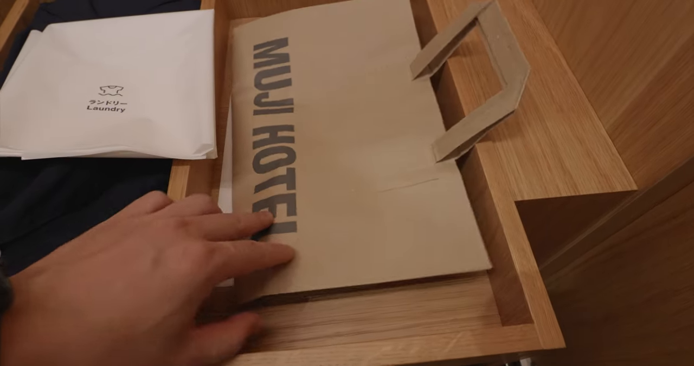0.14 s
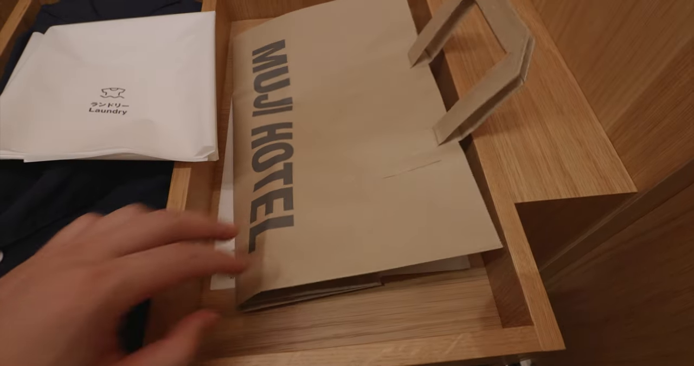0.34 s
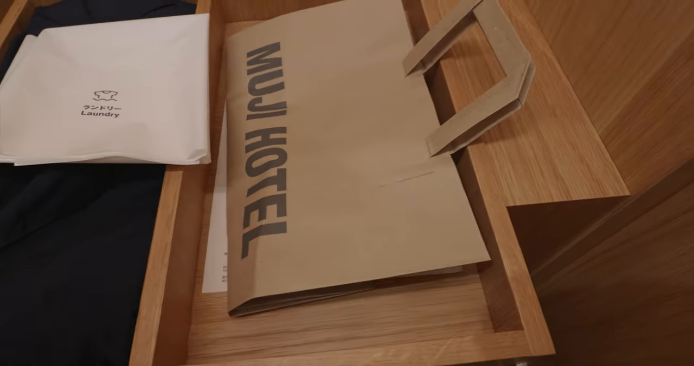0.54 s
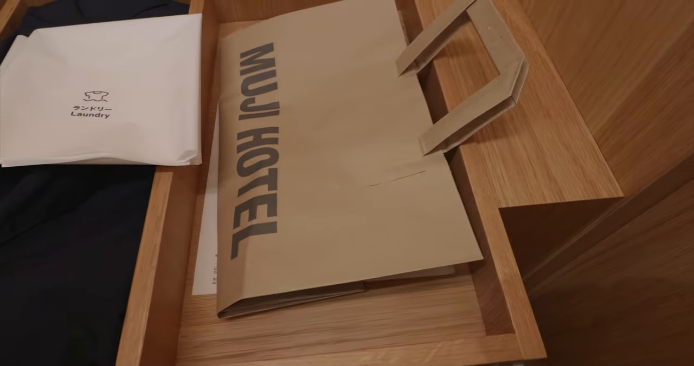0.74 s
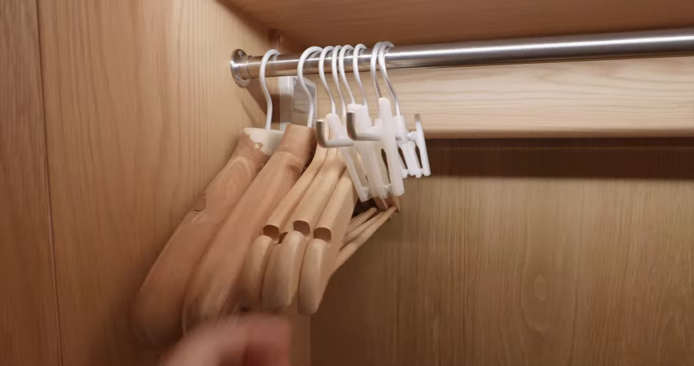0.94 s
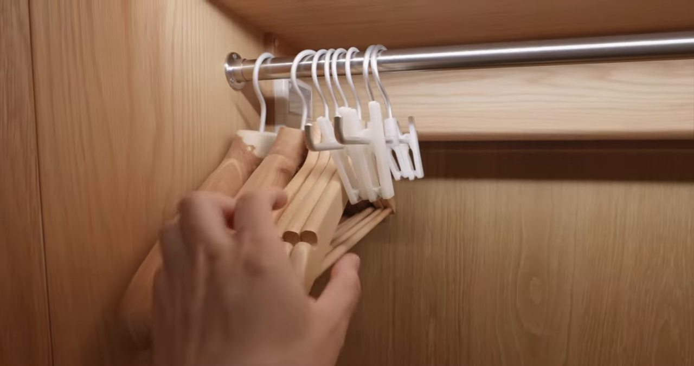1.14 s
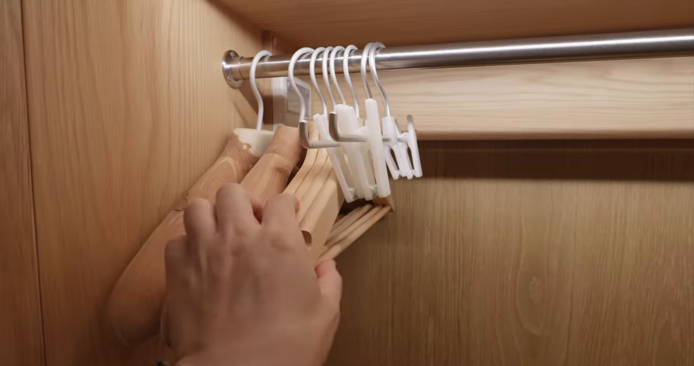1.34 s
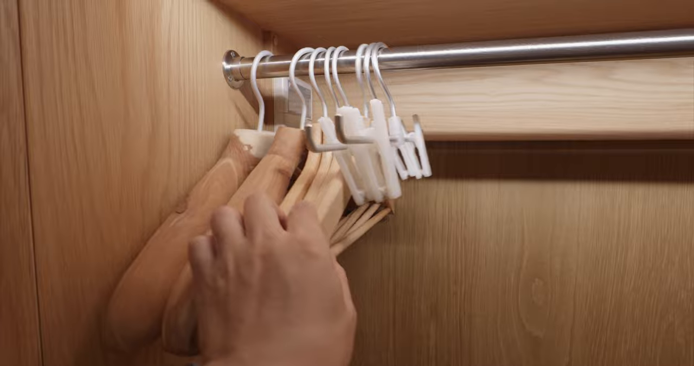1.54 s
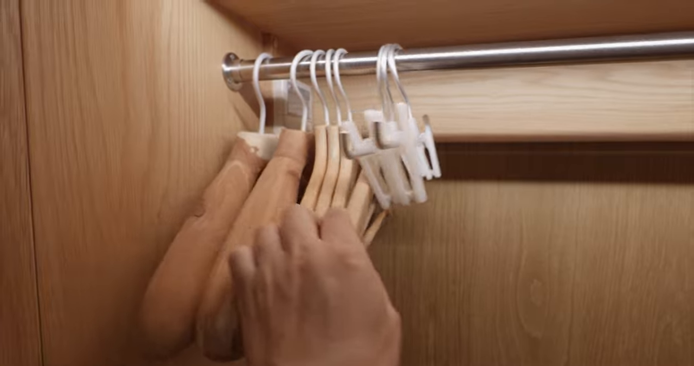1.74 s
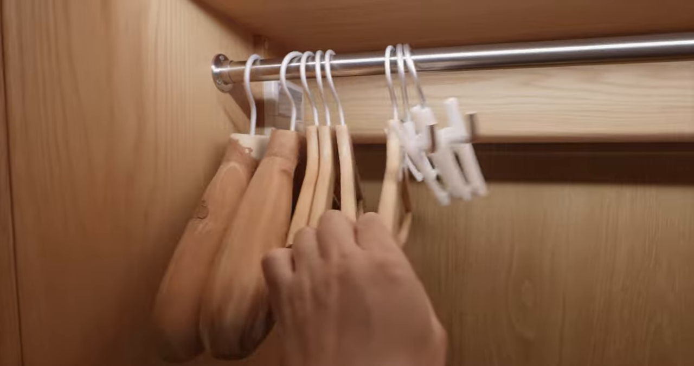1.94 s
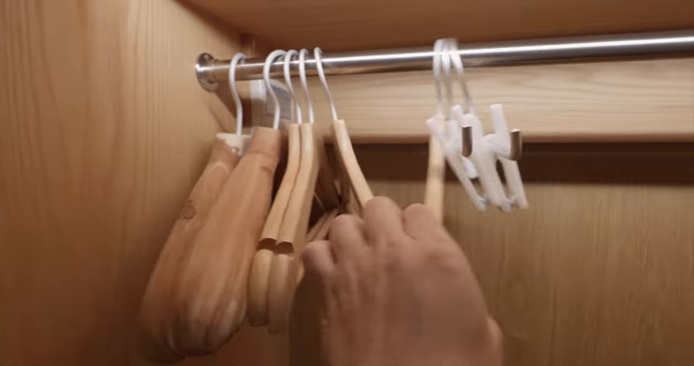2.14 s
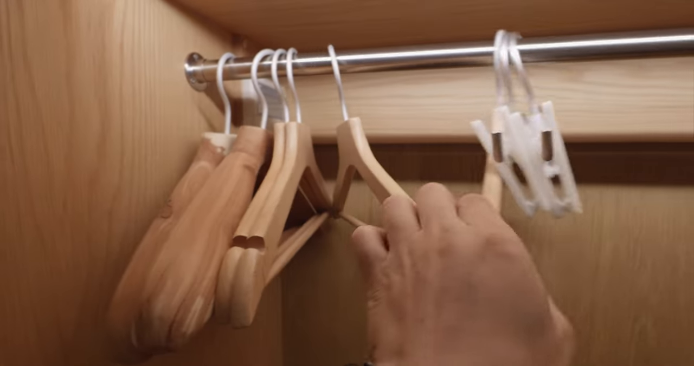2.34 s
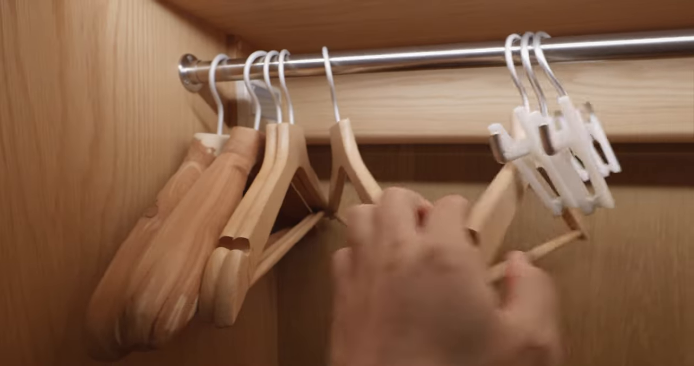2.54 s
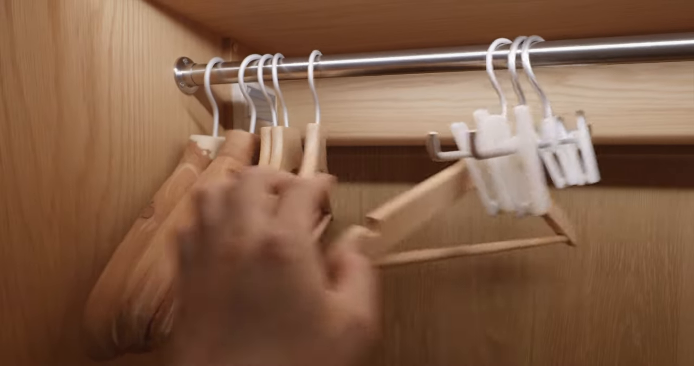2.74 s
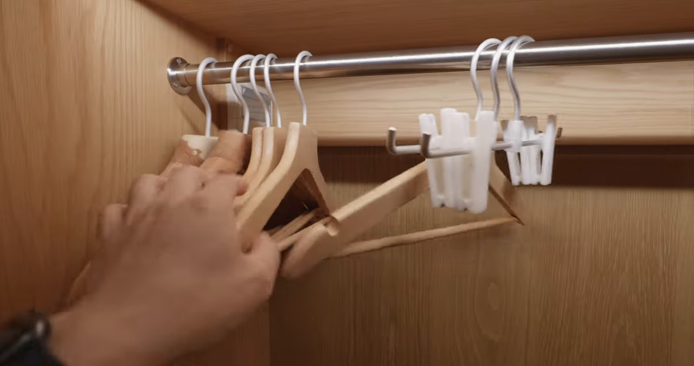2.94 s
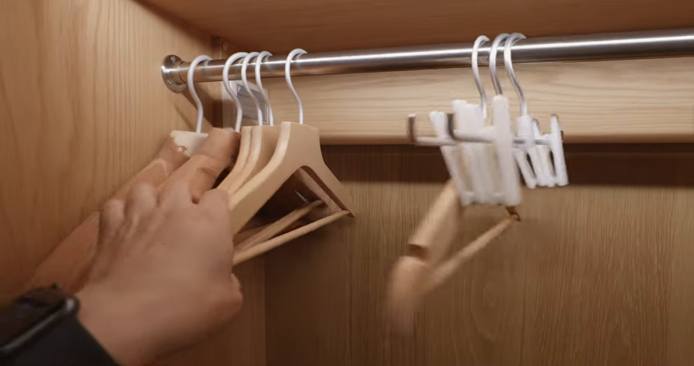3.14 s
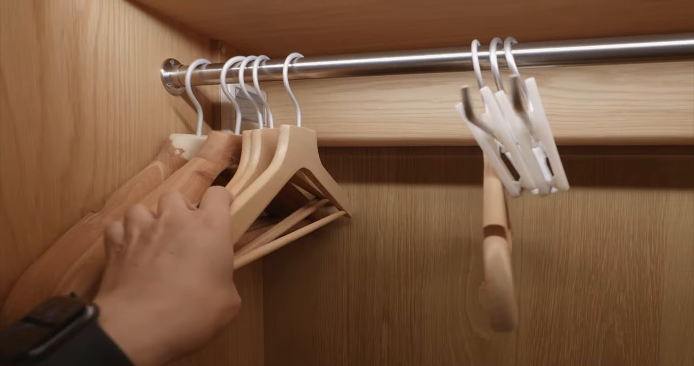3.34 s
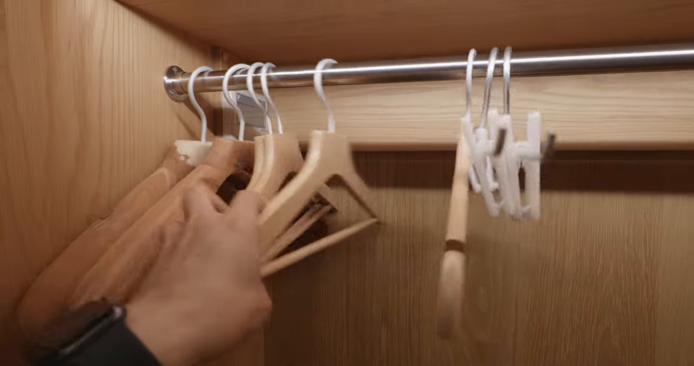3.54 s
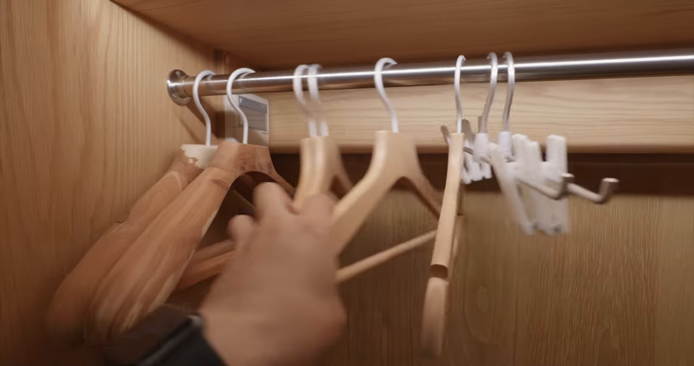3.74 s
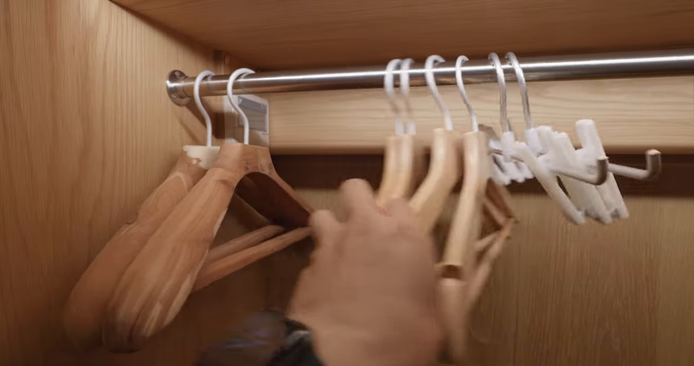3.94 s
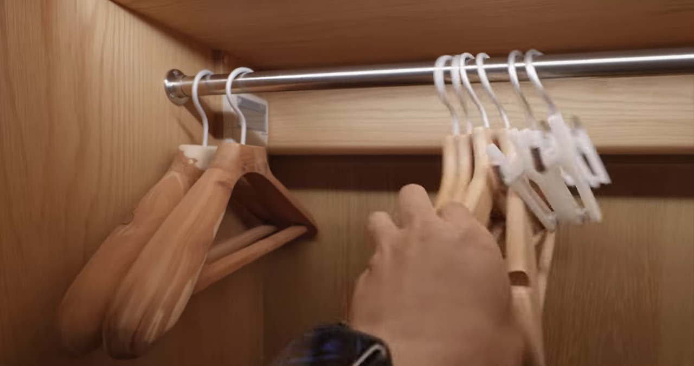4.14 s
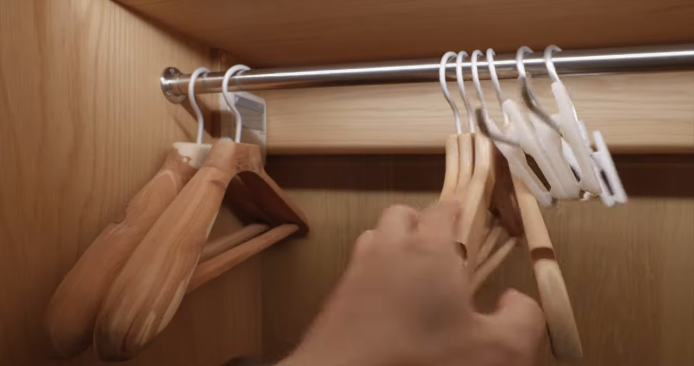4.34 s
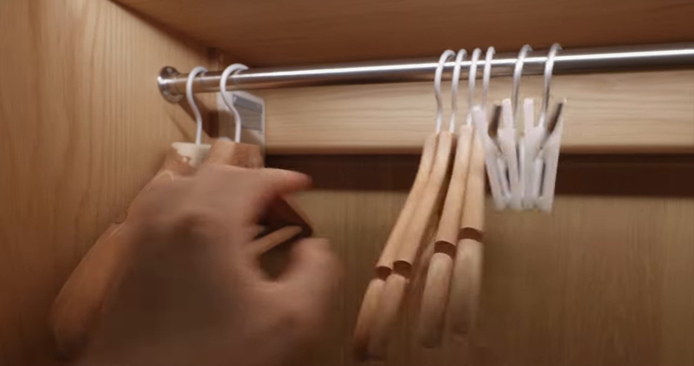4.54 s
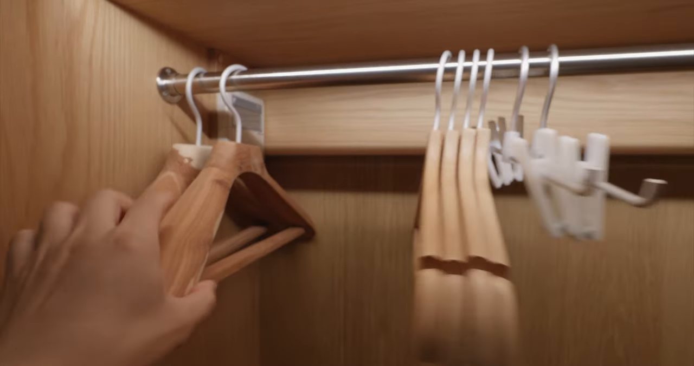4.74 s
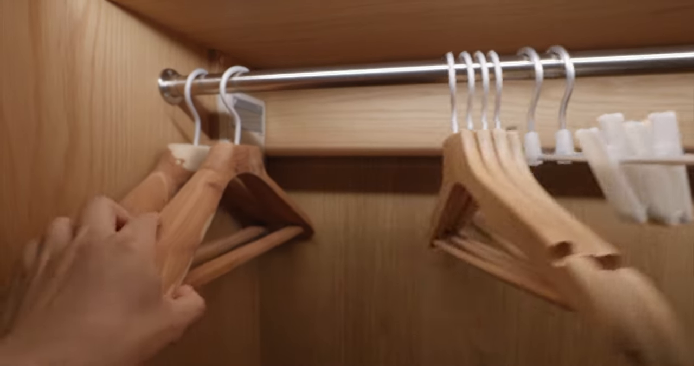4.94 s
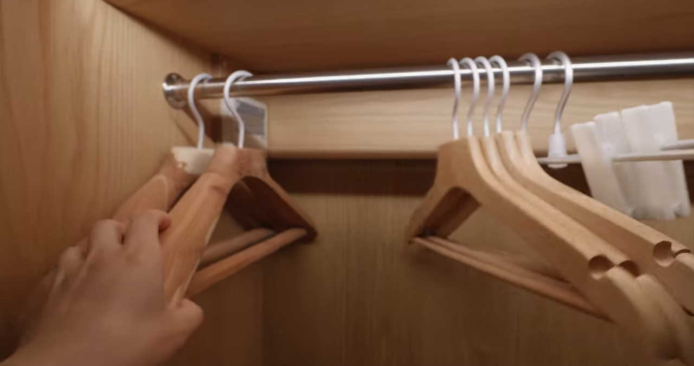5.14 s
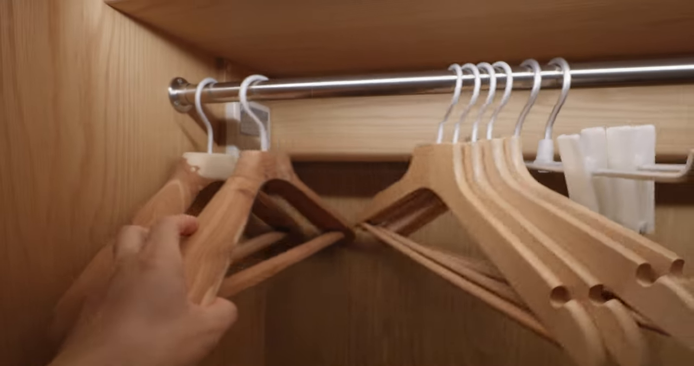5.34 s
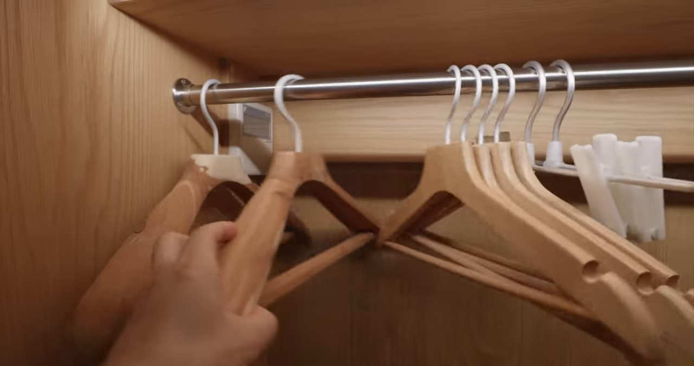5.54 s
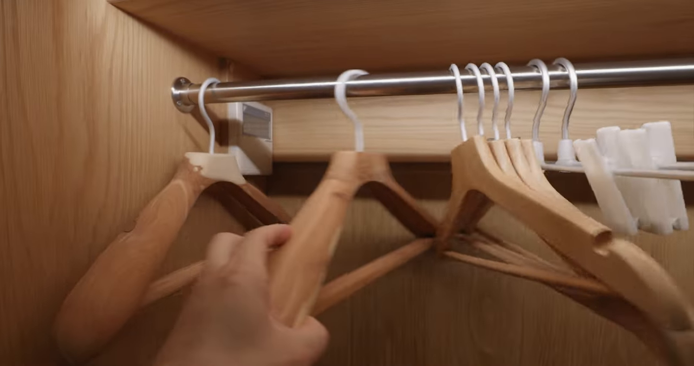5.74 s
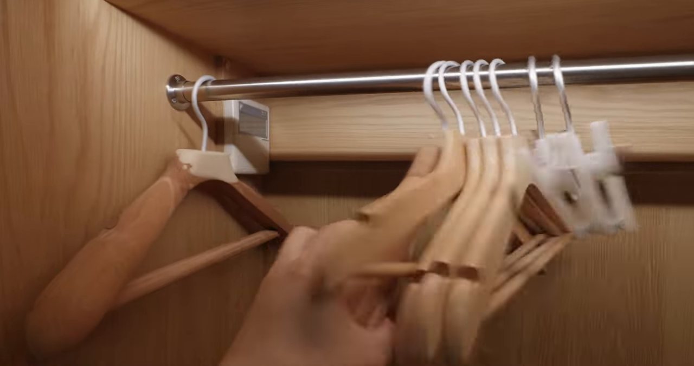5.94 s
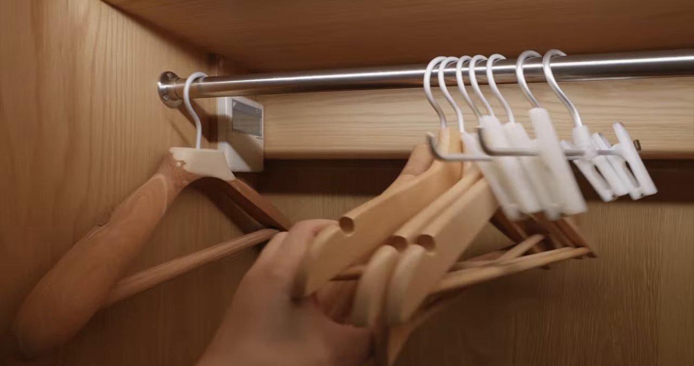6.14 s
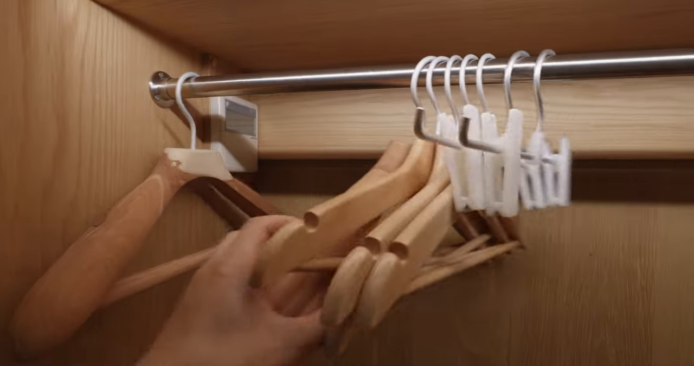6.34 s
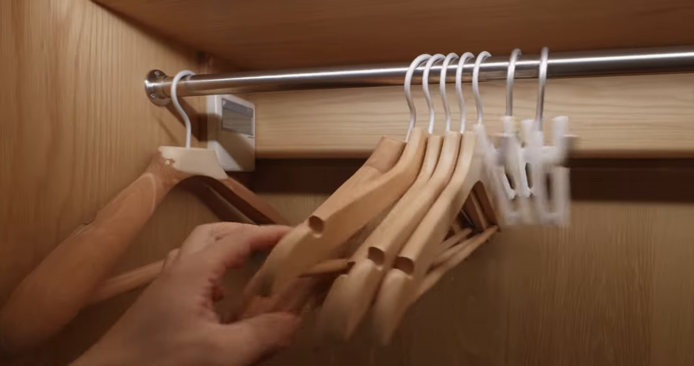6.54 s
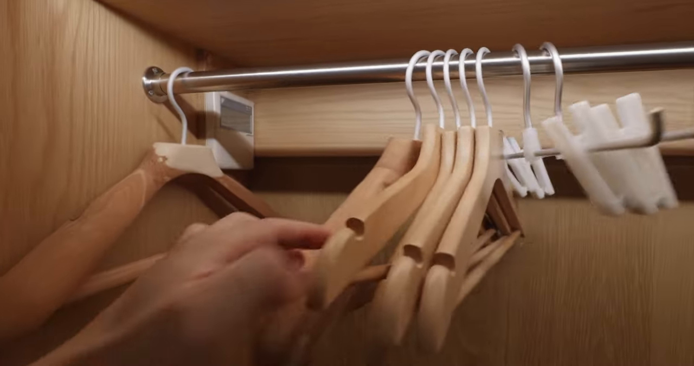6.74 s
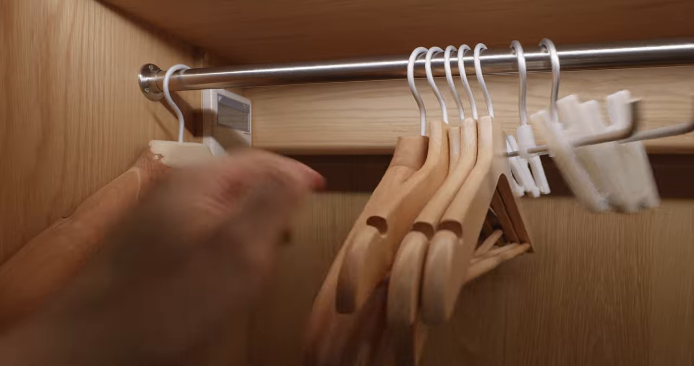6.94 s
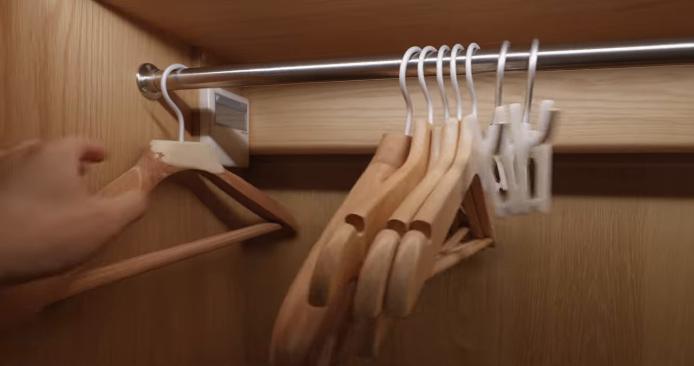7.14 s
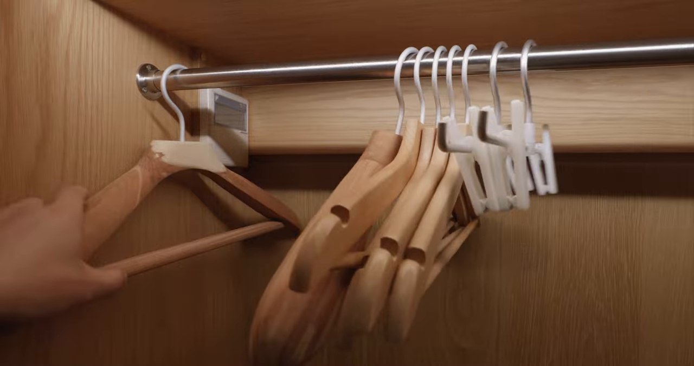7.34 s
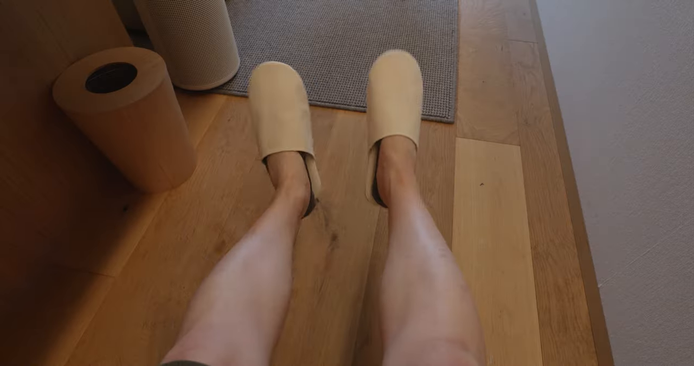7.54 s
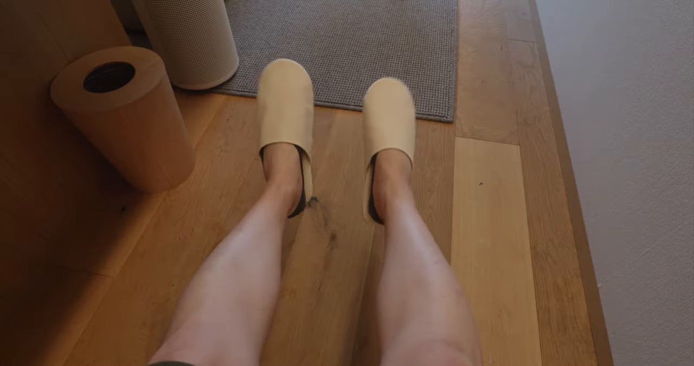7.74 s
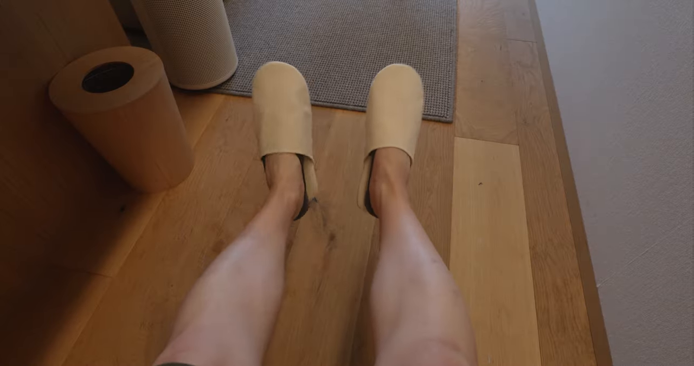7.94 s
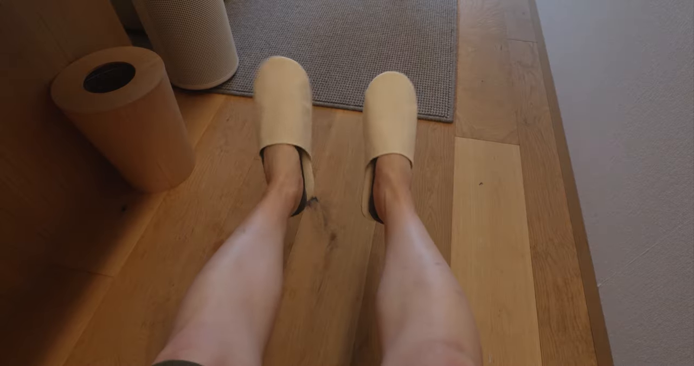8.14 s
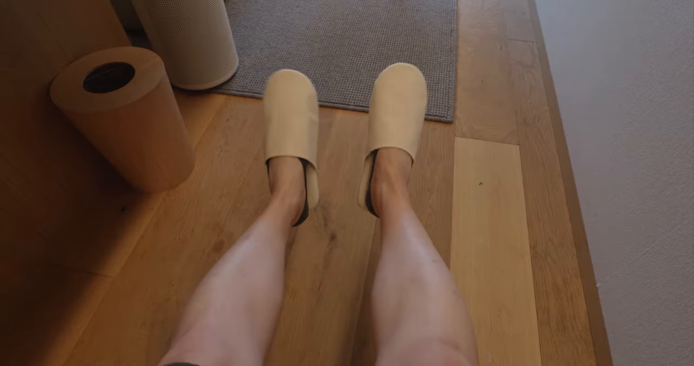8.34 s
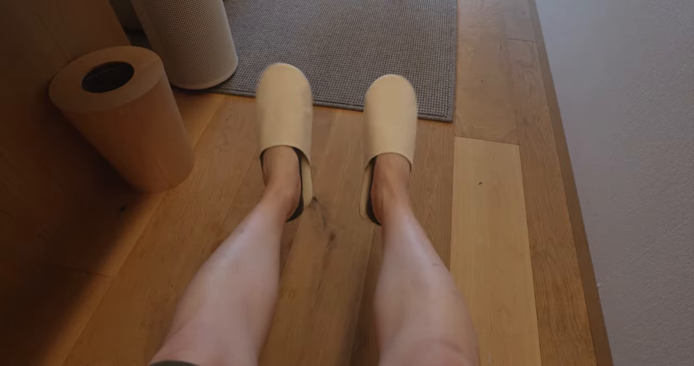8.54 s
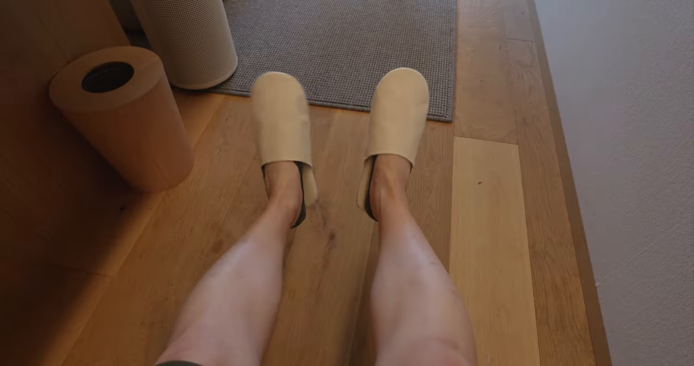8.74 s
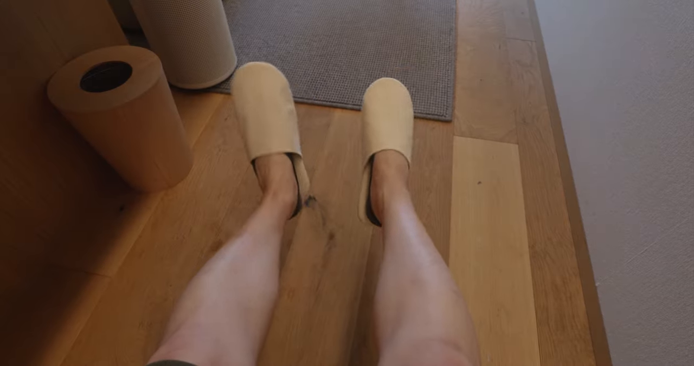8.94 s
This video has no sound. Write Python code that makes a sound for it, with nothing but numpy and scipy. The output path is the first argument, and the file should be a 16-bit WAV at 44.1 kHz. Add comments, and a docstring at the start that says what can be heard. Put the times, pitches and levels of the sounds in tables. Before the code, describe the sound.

Recorded close in a small, quiet room with soft, low air noise throughout. From 0 to about 1.1 s, a hand brushes stiff paper in short, dry strokes, strongest at the very start, with a few faint snaps. Then wooden hangers are pushed along a steel rail inside a wardrobe: dull panel bumps near 1.4 and 1.8 s, a flurry of thin hook ticks from 1.6 to 2.0 s, and a scrape with hollow knocks around 2.0 s. After a lull, wood clacks at 2.9 s and heavier thuds come near 3.3 s. A tiny pitched squeak chirps at 3.6 s, followed by clacks and gritty slides to 4.6 s. A thud at 4.9 s leads to denser, brighter clattering from 5.0 to 6.1 s, then softer clacks until 7.1 s. Bumps and a faint scrape follow at 7.3 s. At about 7.6 s it cuts abruptly, leaving only quiet air.

```python
"""A hand first brushes a paper bag in a drawer: short strokes of friction noise and a few soft snaps.
From about 1.1 s wooden hangers are pushed along the steel rail of a wardrobe. Impulses excite damped modes
as they clack together and bump the panels; their hooks tick, and scrape by many small random slips.
Near 3.6 s stick-slip makes one harmonic squeak; at 7.575 s the wardrobe's sound, with its reverberation,
is cut off abruptly. Soft, filtered air noise of a small room lies under it all and remains at the end."""
import sys
import numpy as np
from scipy import signal
from scipy.fft import irfft
from scipy.io import wavfile
from scipy.ndimage import uniform_filter1d

SR = 44100
rng = np.random.default_rng(int(sys.argv[2]) if len(sys.argv) > 2 else 0)


def dump(signal):
    """Clip the signal to [-1, 1] and save it as 16-bit WAV at the path in sys.argv[1]."""
    limited = np.clip(np.atleast_2d(signal).T, -1, 1)
    pcm = np.round(limited * 32767).astype(np.int16)
    wavfile.write(sys.argv[1], SR, pcm)


N = 400869

# Clacks of wooden hangers; the last two, soft and dull, stand for a starting scrape:
# (time [s], level [dB], treble gain [dB], pitch of the struck hanger [Hz])
CLACKS = [(1.0748, -10, -23, 2195), (2.8714, 18, -22, 2220), (2.877, 12, -10.5, 1990),
          (3.0103, 17, -25, 3460), (3.717, 19.5, -20.5, 1876), (3.986, -3, -23, 1710),
          (4.0868, 6.5, -37, 2200), (4.223, 6, -17, 1720), (4.351, 10.5, -25, 2020),
          (4.4917, -4, -53.5, 2214), (4.617, -1, -65, 1916), (4.7176, 7.5, -27.5, 1917),
          (4.8628, -9.5, -15.5, 1890), (5.0273, 4.5, -7, 1613), (5.0939, 16, -20, 2063),
          (5.1092, 16.5, -22, 2265), (5.4334, 19.5, -11.5, 2205), (5.5229, 7.5, -17.5, 1920),
          (5.682, 15.5, -25, 2016), (5.731, 8, -28.5, 2110), (5.7695, 13.5, -17, 2170),
          (5.7998, 16.5, -24.5, 2150), (6.0103, 3.5, -3, 1520), (6.02, 19.5, -10.5, 2230),
          (6.0879, 8.5, -11, 2220), (6.1661, 7, -32, 2170), (6.2945, 10, -42, 2160),
          (6.3948, 13, -43, 2180), (6.4909, -3, -39, 2000), (6.6982, -8.5, -52, 1510),
          (6.7454, -2, -48, 2124), (6.7741, 9, -17.5, 2030), (6.9067, 16.5, -37.5, 2030),
          (6.9296, 16.5, -24.5, 1978), (7.1005, 2, -23.5, 2134), (7.533, -10, -59, 1970),
          (7.555, -2.5, -48, 1347)]
# Hangers bumping the cabinet: (time [s], level [dB], middle gain [dB], edge gain [dB], boom of the wood [Hz])
KNOCKS = [(1.379, 17, -15, -22, 242), (1.465, 28.5, -3, -4, 237), (1.797, 22, -14, -22, 230),
          (1.872, 18, -19, -38, 223), (2.008, 20.5, 3.5, -1, 619), (2.021, 20.5, 6, -21, 144),
          (2.154, 20.5, 4, -22, 640), (2.855, 14.5, 3.5, -14, 243), (3.265, 30, -9.5, -9, 246),
          (3.295, 27, -1.5, -9.5, 227), (3.322, 20.5, -7, -4.5, 250), (3.478, 20, -9.5, -17, 246),
          (3.519, 13.5, -9, -30, 213), (4.393, 21.5, -3.5, -5, 425), (4.9035, 27, -6.5, -14.5, 227),
          (7.267, 25, -15, -4.5, 146), (7.41, 15.5, -16, -15.5, 221)]
# Hooks pushed along the rail: (start [s], length [s], level [dB], share of fine hiss [dB], judder [dB])
PUSHES = [(1.1, 0.78, -63.5, -22, -12.5), (1.5, 0.31, -42, -17, -16.5), (1.964, 0.41, -37, 4.5, -11.5),
          (2.46, 0.2, -52, -12, -20.5), (3.315, 0.068, -36.5, -38, -11), (3.568, 0.24, -44, 5.5, -35),
          (3.708, 0.087, -30, -6, -17.5), (3.942, 0.2, -50.5, 9.5, -19.5), (4.09, 0.095, -31.5, -1, -17.5),
          (4.288, 0.11, -42, -17, -17), (4.598, 0.05, -46.5, -30, -10.5), (5.362, .3, -47, 6.5, -19.5),
          (5.7, 0.29, -33.5, -3, -18), (6.03, 0.1, -29.5, -13.5, -21), (7.288, 0.32, -52.5, -5, -10.5)]
# Steel hooks touching: (time [s], level [dB], ring of the wire [dB])
TICKS = [(1.572, -3, -9), (1.612, -4, -18), (1.6504, 1, 5), (1.718, 3, -35), (1.767, 0.5, -14),
         (1.8805, -8, -18), (1.8936, -4, -18), (1.9083, 2, -15), (1.9338, 0.5, -10), (1.954, 4, -13),
         (2.016, 2, -15), (2.1314, 2.5, -21), (2.5301, -18.5, 1), (2.6344, -23, -20), (2.6678, -20, -12),
         (3.2122, -7.5, -19), (3.269, -5.5, -10), (4.135, 5, -9), (4.1537, 5.5, -10), (4.2192, 12.5, 4),
         (4.377, 3, -10), (4.627, -14, -4), (5.9745, -2.5, -1), (6.012, 8.5, -21), (6.0215, 20.5, -20),
         (6.087, 16, -13), (6.242, -4.5, -18), (6.4494, -10, -20)]
# Overtones of the squeak: (multiple of the pitch [1], level [dB])
SQUEAK_PARTIALS = [(1, 0), (2, -17), (3, -19), (4, -19), (5, -30)]
# Hand and sleeve brushing paper: (time of the peak [s], rise [s], fall [s], level [dB])
STROKES = [(.005, 0.0091, 0.024, -42.5), (.175, 0.021, 0.022, -47.5), (.245, 0.022, 0.0079, -46.5),
           (.56, 0.05, 0.062, -59.5), (.84, 0.026, 0.023, -48), (1.12, 0.02, 0.035, -46)]
# Soft snaps of the paper: (time [s], level [dB])
PAPER_SNAPS = [(0.012, -8.5), (.024, -14), (.239, -18.5)]

# Modes of the steel rail, the wooden cabinet and a wire hook: (frequency [Hz], level [dB], t60 [s])
RAIL = [(744, -9, 0.27), (963, -4, 0.32), (1360.3, 5, 0.26), (1536, -5, 0.22), (1820, -16, 0.2),
        (2154, 5.5, 0.13), (2913, -10.5, 0.23), (3236, 6.5, 0.17), (3437, -4, 0.353), (4160, -25.5, .35),
        (5160, 0.5, 0.34), (4750, -11, 0.27)]
CABINET = [(116.6, -7, 0.64), (138.3, 0.5, 0.12), (208.9, -3, 0.31), (226.3, -2, .2), (248, -8.5, 0.22),
           (330.3, -4.5, 0.17), (395, -11, .45), (584, -3.5, 0.26), (644.5, -2, 0.2), (752, -1.5, 0.15),
           (966, -20, 0.24)]
HOOK = [(4750, -16, 0.2), (6620, 7, 0.09), (6900, -2.5, 0.043), (7340, -8.5, 0.1), (8600, -10, 0.19),
        (11600, 1, .13), (11700, -7.5, .1)]

# Spectra of struck wood, panels and steel: (frequency [Hz], level [dB per Hz])
WOOD = [(30, -54.5), (60, -28), (110, -5.5), (200, 11.5), (450, 5), (900, -4), (2000, 1), (2600, -3),
        (4600, -0.5), (7000, 5), (9500, 1), (12000, -13.5), (16000, -29.5)]
PANEL = [(30, -51.5), (70, -30), (120, -4.5), (230, -1.5), (420, -3.5), (750, 1.5), (1100, -3), (1800, -7),
         (3500, -18.5), (6000, -34), (10000, -46), (16000, -62.5)]
STEEL = [(100, -24), (700, -13), (2500, -7.5), (4200, -4.5), (6500, -5), (9000, -5.5), (12500, 0.5),
         (16000, -21)]
# Spectra of sliding: grating, fine hiss and coarse judder: (frequency [Hz], level [dB per Hz])
SCRAPE = [(200, -48), (900, -2), (1400, 9.5), (2100, 10), (2700, -1), (3500, 6), (5200, 1.5), (7400, -10.5),
          (10000, -20), (16000, -30.5)]
HISS = [(1500, -17), (5000, -7), (6500, 0), (8800, 8), (10000, -5.5), (11800, -10.5), (14000, -16.5),
        (16000, -39.5)]
JUDDER = [(20, -57), (40, -32), (80, -6), (115, -0.5), (165, -8), (230, 4), (450, -9.5), (680, -9.5),
          (1000, -8), (2000, -18), (5000, -56.5)]
# Spectra of rubbed paper and of the air noise: (frequency [Hz], level [dB per Hz])
PAPER = [(30, -14), (100, 7), (300, 0.5), (1300, 2), (2500, -3.5), (6000, -13), (10000, -16.5),
         (16000, -40)]
AIR = [(15, -91.5), (25, -60.5), (97, -8.5), (130, 1), (157, -9.5), (242, -5.5), (394, -15.5), (659, -17.5),
       (754, -22), (1260, -22.5), (1370, -25), (1740, -25.5), (3340, -33.5), (9320, -41), (16000, -52.5)]
# Reverberation of the enclosure: (frequency [Hz], t60 [s])
ROOM_T60 = [(100, 1.09), (260, 0.54), (700, 0.71), (1840, 0.39), (4850, 0.38), (8000, 0.28), (13000, 0.18)]

CLACK_BASS_DB, BASS_PER_DB = -9.5, -0.3438  # light touches are rounder, hard blows thinner
CLACK_RING_DB, RING_PER_TREBLE_DB = -10, -0.07  # sharp contacts near the hook ring the hanger less
GRAZE_LEAD_S, GRAZE_DB = 0.0026, -30.5  # one end of the hanger meets the next first
REBOUND_SCALE_S, REBOUND_DB = 0.006, -19  # the delay is a random multiple of this scale
RAIL_LOAD_SHARE = 0.01  # relative spread of the rail modes as the moving hooks load it
BOOM_T60_S, BOOM_PAIR_RATIO, BOOM_PAIR_DB = 0.11, 1.1, -6.5  # two close modes of the wood
KNOCK_RAIL_DB = -34  # the jolt reaches the rail through its brackets
PUSH_RISE_S, SLOWING_DB_PER_S, STOP_DB_PER_S = 0.034, 13, 126  # the stop rate adds to the slowing rate
JUDDER_EXPONENT = 0.58  # judder follows the force of a push less steeply
JANGLE_DB, JANGLES_PER_S = -6, 71  # hooks jostle each other as they slide
TICK_TOP_DB = -15.5  # gain from 12 kHz up
SQUEAK_S, SQUEAK_DB, SQUEAK_HZ = 3.622, -26, 1552
SQUEAK_SHARP_SHARE, SQUEAK_SETTLE_S = 0.015, 0.018
SQUEAK_HALF_WIDTH_S = 0.016  # from the peak to half amplitude
AIR_REFERENCE_DB = -48  # the offsets in air() are relative to this
WARDROBE_CUT_S = 7.575  # the wardrobe's sound and its reverberation are cut off abruptly
BAND_LIMIT_HZ = 16200

TIME = np.arange(N) / SR
RING = np.arange(SR) / SR  # one second of ringing time [s]
HZ = np.fft.rfftfreq(4096, 1 / SR)


def clacks():
    """Impact excitation: graze, hard contact and rebound ring the hanger; the hook drives rail and cabinet."""
    out = np.zeros(N)
    for s, db, treble_db, hz in CLACKS:
        blow = np.zeros(SR // 2)
        add(blow, 0, amp(-6.5) * burst(t60=0.077) + burst(t60=0.12))
        rebound_s = REBOUND_SCALE_S * rng.uniform(0.59, 2)
        add(blow, rebound_s, amp(REBOUND_DB) * burst(t60=0.025))

        # bending modes: the struck hanger and its detuned neighbours
        neighbours = [(hz, -1, 0.04), (hz, -1, 0.04), (1.55 * hz, -3, 0.04), (2.2 * hz, -5, 0.04)]
        hangers = [(hz, 0, 0.05)] + detuned(neighbours, share=0.09)
        ring_gain = amp(CLACK_RING_DB + RING_PER_TREBLE_DB * treble_db)
        add(blow, 0.001, ring_gain * modes(hangers, spread_db=4.5, size=8192))
        loaded_rail = detuned(RAIL, share=RAIL_LOAD_SHARE)
        add(blow, 0.002, amp(-14.5) * modes(loaded_rail, size=SR // 2))
        add(blow, 0.004, amp(-10) * modes(CABINET, size=SR // 2))

        bass_db = CLACK_BASS_DB + BASS_PER_DB * db
        hardness = read([(450, bass_db), (900, 0), (4500, 0.00062), (9500, treble_db)])
        spectrum = read(WOOD) + hardness
        add(out, s, amp(db) * colour(blow, spectrum))
        graze = colour(burst(t60=0.04), spectrum)
        add(out, s - GRAZE_LEAD_S, amp(db + GRAZE_DB) * graze)
    return out


def knocks():
    """Modal response to a blunt push: a panel booms briefly, the frame clatters, cabinet and rail hum on."""
    out = np.zeros(N)
    for s, db, middle_db, edge_db, hz in KNOCKS:
        lower = np.sin(2 * np.pi * hz * RING)
        upper = amp(BOOM_PAIR_DB) * np.sin(2 * np.pi * BOOM_PAIR_RATIO * hz * RING)
        boom = unit((lower + upper) * amp(-60 * RING / BOOM_T60_S))
        clatter = colour(burst(t60=0.16), read([(200, 4.3), (450, 0.5)]))
        blow = amp(-15.0) * boom
        blow += amp(-12.5) * modes(CABINET, spread_db=7.5)
        blow += amp(-18.0) * modes(RAIL)
        add(blow, 0.001, clatter)
        blow[0] += amp(-11.0)  # the first click of contact
        hardness = read([(330, 0), (650, middle_db), (1600, edge_db)])
        body = colour(blow, read(PANEL) + hardness)
        hum = colour(modes(RAIL), read([(2000, 1.5), (4500, -20.5)]))
        add(out, s, amp(db) * (body + amp(KNOCK_RAIL_DB) * hum))
    return out


def sliding(count=4):
    """Dry friction: hooks grate by random slips under unsteady pressure; coarse slips shake the cabinet."""
    force, fine, shake, slips, jangle = np.zeros((5, N))
    for start, length, db, hiss_db, judder_db in PUSHES:
        one = amp(db) * push(start, length)
        force += one
        fine += amp(hiss_db) * one
        shake += amp(judder_db) * one ** JUDDER_EXPONENT

    # each hook has its own ring
    for _ in range(count):
        pressure = amp(3.5 * waver(size=700))
        hook_slips = pressure * grains(per_s=350, spread_db=-0.5)
        slips += through(hook_slips, burst(t60=0.022, size=1024))
        touches = grains(per_s=JANGLES_PER_S / count, spread_db=1.0)
        jangle += through(touches, tick(ring_db=-3.5))
    slips = slips + amp(-20.5) * through(slips, modes(RAIL))
    coarse = grains(per_s=360, spread_db=0.5)
    coarse = coarse + amp(-16) * through(coarse, modes(CABINET))

    grate = force * even(colour(slips, read(SCRAPE)))
    fine_slips = amp(-17.5) * even(colour(slips, read(HISS)))
    hiss = fine * (fine_slips + amp(JANGLE_DB) * even(jangle))
    judder = shake * even(colour(coarse, read(JUDDER)))
    return grate + hiss + judder


def push(start, length):
    """Force envelope of sliding friction: a push takes hold, slows, and after its length runs out."""
    t = np.maximum(TIME - start, 0)
    overrun = np.maximum(t - length, 0)
    return np.minimum(t / PUSH_RISE_S, 1) * amp(-SLOWING_DB_PER_S * t - STOP_DB_PER_S * overrun)


def ticks():
    """Impact of stiff bodies: the clear touches of hook on hook."""
    out = np.zeros(N)
    for s, db, ring_db in TICKS:
        add(out, s, amp(db) * tick(ring_db))
    return out


def tick(ring_db):
    """Short contact of steel on steel: a very short click and the thin ring of neighbouring wires."""
    wires = modes(detuned(HOOK + HOOK + HOOK, share=0.045), size=8192)
    blow = burst(t60=0.021) + amp(1.5) * burst(t60=0.065) + amp(ring_db) * wires
    return colour(blow, read(STEEL) + read([(8000, 0.008), (12000, TICK_TOP_DB)]))


def squeak():
    """Stick-slip oscillation: a harmonic chirp starts sharp and sinks to a pitch that still wavers a little."""
    t = TIME - SQUEAK_S
    settling = 0.5 * (1 - np.tanh(t / SQUEAK_SETTLE_S + 1))  # falls from 1 to 0
    hz = SQUEAK_HZ * (1 + SQUEAK_SHARP_SHARE * settling)
    unsteady = 1 + 0.014 * waver(size=40)
    turns = np.cumsum(hz * unsteady) / SR
    tone = sum(amp(partial_db) * np.sin(2 * np.pi * k * turns) for k, partial_db in SQUEAK_PARTIALS)
    swell = (abs(t) < 0.1) / (1 + (t / SQUEAK_HALF_WIDTH_S) ** 2)
    return amp(SQUEAK_DB) * swell * even(tone)


def paper():
    """Granular friction: fingers drag over stiff paper in strokes that swell and fade, with a few soft snaps."""
    drag = np.zeros(N)
    for s, rise, fall, db in STROKES:
        distance = np.maximum((s - TIME) / rise, (TIME - s) / fall)
        drag += amp(db) * np.exp(-distance)
    out = drag * even(colour(grains(per_s=3300, spread_db=-1.0), read(PAPER)))
    for s, db in PAPER_SNAPS:
        add(out, s, amp(db) * unit(colour(burst(t60=0.056), read(PAPER))))
    return out


def air():
    """Broadband noise of soft air: rises after 1 s, sinks slightly, rises again as the wardrobe stops."""
    settle = 4096  # samples dropped while the filter fills
    noise = even(colour(rng.standard_normal(N + settle), read(AIR))[settle:])
    offset_db = np.interp(TIME, [1, 1.1, 7.5, 7.6], [-4.5, -2.0, -3.0, -1.0])
    return noise * amp(AIR_REFERENCE_DB + offset_db)


def room(x, wet_db, build_s=0.00067, count=4):
    """Diffuse reverberation: reflections build up and decay; their pattern crossfades every 0.13 s."""
    place = TIME / 0.13
    out = x.copy()
    for k in range(count):
        hz, t, z = signal.stft(rng.standard_normal(SR), SR, nperseg=256)
        decay = amp(-60 * t / read(ROOM_T60, hz)[:, None])
        tail = signal.istft(z * decay, SR, nperseg=256)[1][:SR]
        response = unit(tail * (1 - np.exp(-RING / build_s)))
        share = np.cos(np.pi / 2 * np.minimum(abs((place - k) % count - 1), 1))
        out += amp(wet_db) * through(x * share, response)
    return out


def burst(t60, size=8192):
    """High modal density: many close modes and near reflections merge into decaying noise."""
    return unit(rng.standard_normal(size) * amp(-60 * RING[:size] / t60))


def modes(table, spread_db=2, size=SR):
    """Modal superposition of damped sines; the place of the blow changes the share and sign of each."""
    t = RING[:size]
    shares = amp(spread_db * rng.standard_normal(len(table))) * rng.choice([-1, 1], len(table))
    out = np.zeros(size)
    for share, (hz, db, t60) in zip(shares, table):
        out += share * amp(db - 60 * t / t60) * np.sin(2 * np.pi * hz * t)
    return unit(out)


def detuned(table, share):
    """Variation of natural frequencies: each mode lies a little elsewhere, by a random relative shift."""
    return [(hz * (1 + share * rng.standard_normal()), db, t60) for hz, db, t60 in table]


def grains(per_s, spread_db):
    """Random impulse process: tiny slips of uneven size at random moments."""
    sizes = amp(spread_db * np.minimum(rng.exponential(1, N), 4))
    return even(sizes * rng.standard_normal(N) * (rng.random(N) < per_s / SR))


def waver(size):
    """Low-passed random drift, smoothed twice over size samples."""
    return even(uniform_filter1d(uniform_filter1d(rng.standard_normal(N), size), size))


def colour(x, db):
    """Minimum-phase filtering: a causal response with the given gain on the HZ grid."""
    log_gain = np.log(amp(np.r_[db, db[-2:0:-1]]))
    spectrum = np.exp(np.conj(signal.hilbert(log_gain)))
    return through(x, irfft(spectrum[:len(HZ)]))


def through(x, response):
    """Linear response by convolution, keeping the length."""
    return signal.oaconvolve(x, response)[:len(x)]


def read(points, hz=HZ):
    """Logarithmic frequency scale: joins (frequency [Hz], value) points by interpolation."""
    f, value = np.transpose(points)
    return np.interp(np.log(hz + 1), np.log(f), value)


def add(mix, s, sound):
    """Superposition: mixes a sound in at time s, cut at the end of the mix."""
    part = mix[max(round(s * SR), 0):][:len(sound)]
    part += sound[:len(part)]


def amp(db):
    """Level to amplitude: decibels to gain."""
    return 10 ** (np.asarray(db) / 20)


def unit(x):
    """Energy normalization: scales to an energy of one."""
    return x / np.sqrt(np.sum(x ** 2) + 1e-20)


def even(x):
    """Power normalization: scales to an rms of one."""
    return unit(x) * np.sqrt(x.size)


def scene():
    """Direct and reverberant sound: the wardrobe shares one room level; panels and paper are drier."""
    contacts = clacks() + ticks() + sliding() + squeak()
    wardrobe = room(contacts, wet_db=-5.0) + room(knocks(), wet_db=-10.5)
    present = np.clip((WARDROBE_CUT_S - TIME) / 0.003, 0, 1)  # gates the reverberation too
    return (wardrobe * present + room(paper(), wet_db=-11.0, count=2) + air())[None]


def record(dry):
    """Microphone saturation and bandwidth: peaks round off, then the deepest bass and highest treble go."""
    rounded = np.tanh(0.7 * dry) / 0.7
    lean = signal.sosfilt(signal.butter(2, 45, "highpass", fs=SR, output="sos"), rounded)
    band_limit = signal.firwin(511, BAND_LIMIT_HZ, window=("kaiser", 9), fs=SR)
    return signal.oaconvolve(lean, band_limit[None], "same")


dry = scene()
out = record(dry)
dump(out)
```